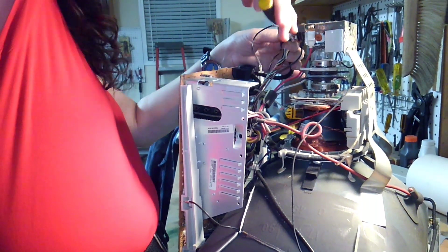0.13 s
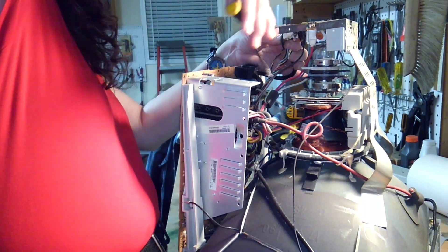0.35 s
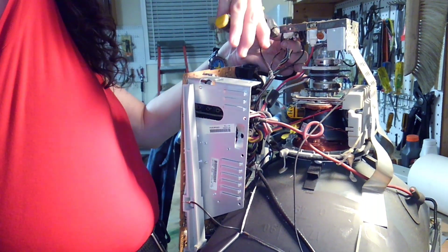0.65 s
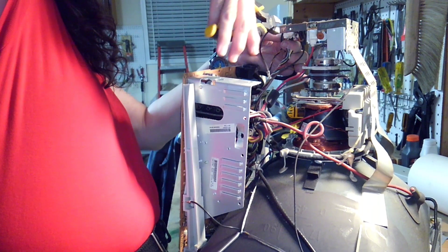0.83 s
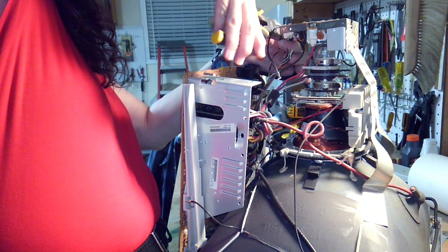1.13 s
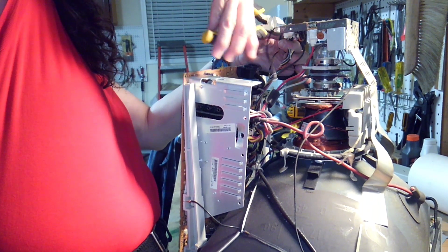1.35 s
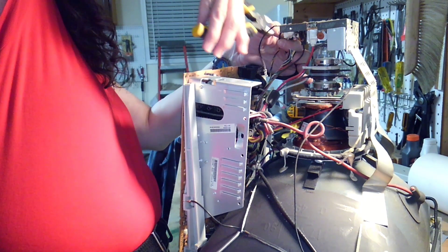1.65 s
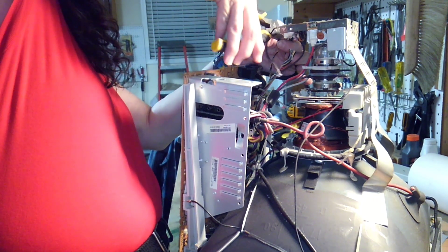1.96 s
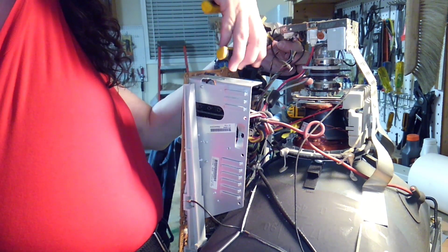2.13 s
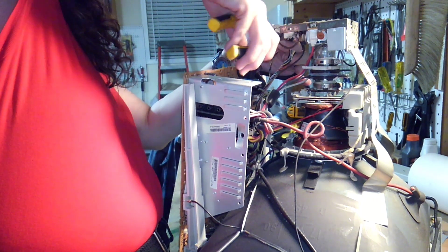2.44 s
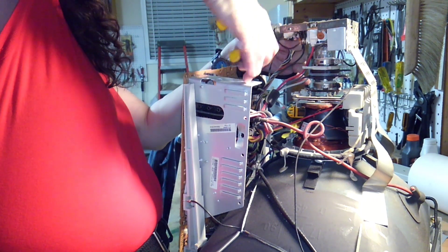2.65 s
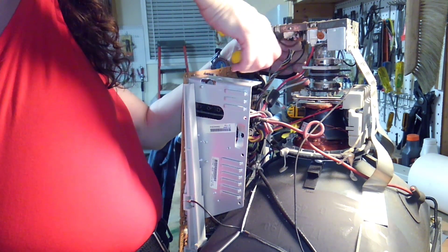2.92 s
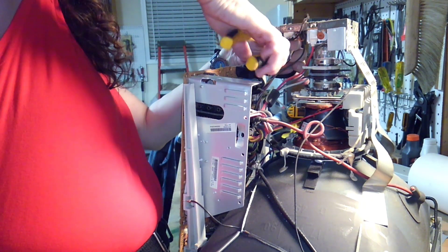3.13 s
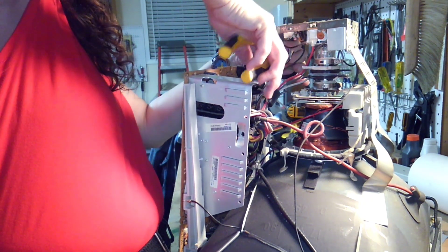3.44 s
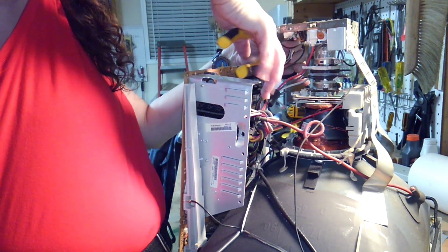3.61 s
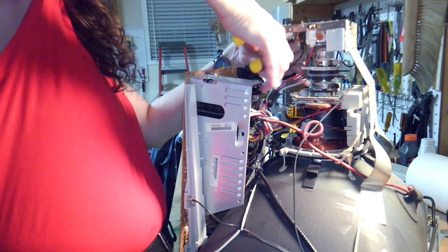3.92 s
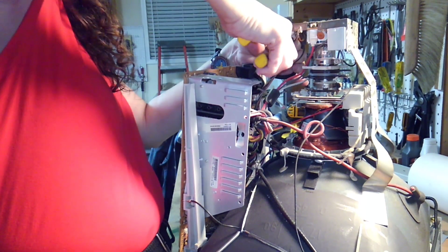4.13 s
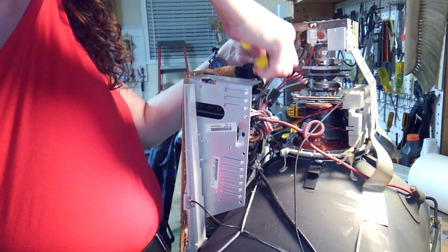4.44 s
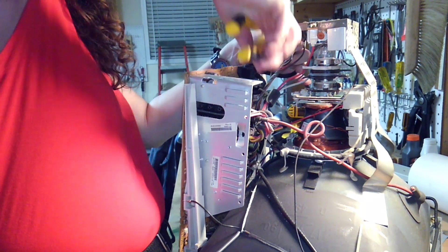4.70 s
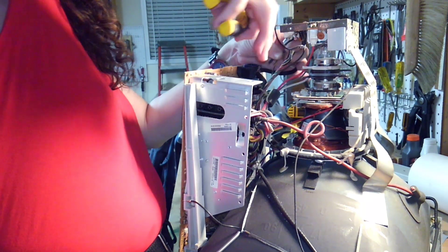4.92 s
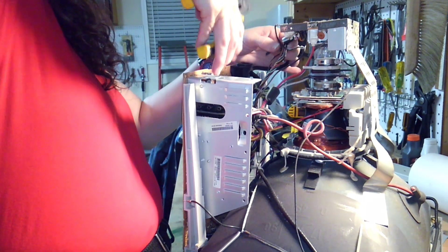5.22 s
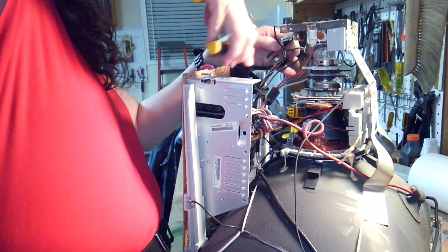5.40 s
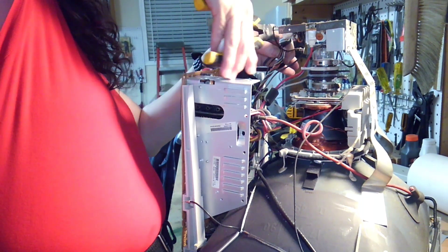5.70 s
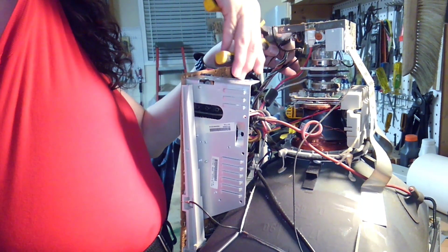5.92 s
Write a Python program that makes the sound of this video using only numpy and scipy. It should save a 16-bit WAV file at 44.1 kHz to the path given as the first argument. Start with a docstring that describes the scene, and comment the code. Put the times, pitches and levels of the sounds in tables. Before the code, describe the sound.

Wire cutters tick lightly, snap hard twice, scrape dragged wires and thump the bench softly in a hard-walled workshop with quiet background noise.

```python
"""Wire cutting inside an opened monitor

Hand cutters snip wire inside an opened monitor on a workshop bench, an arm's length from a small camera.
Each contact is a spray of tiny cracks lasting milliseconds, shaped by the broad resonances of the case.
Dull knocks, a faint ping and dragged wires join in; firm contacts thump the bench in two low modes.
A hard-walled room answers with a bright tail, over microphone hiss and a low building rumble."""
import sys
import numpy as np
from scipy import signal
from scipy.fft import rfft, irfft, next_fast_len
from scipy.io import wavfile

SR = 44100
rng = np.random.default_rng(int(sys.argv[2]) if len(sys.argv) > 2 else 0)


def transcribe(u):
    """Save the signal u as a 16-bit wav file named by the first command-line argument.

    u: samples, shape (n,) or (channels, n), limited to [-1, 1]; the rate is SR.
    q: integer samples, one column per channel.
    """
    v = np.clip(np.atleast_2d(u).T, -1, 1)
    q = np.round(v * 32767).astype(np.int16)
    wavfile.write(sys.argv[1], SR, q)


def makeup_ratio(level_db):
    """Linear amplitude ratio for a level in decibels (20 dB per factor of ten)."""
    decades = np.asarray(level_db, float) / 20
    return 10 ** decades


N = 267246  # length in samples
TIME = np.arange(N) / SR  # seconds

# Contacts of jaws and wire ends. Each row: start in seconds, peak of the direct sound in dB,
# crack centre in Hz, lower ring in dB relative to the crack, length of the spray in ms.
CONTACTS = [(0.034, -42, 5900, 3, 26), (0.0593, -29, 6500, -2.5, 18), (0.335, -37, 6100, -6, 14),
            (0.3995, -28, 6500, -14, 13), (0.401, -28.5, 4200, -6, 13), (0.881, -41.5, 4960, -2, 6),
            (0.9267, -22, 4110, -5, 7.5), (0.93, -32.5, 6400, -17, 7.4), (1.527, -44, 5990, -10, 6.3),
            (1.5385, -12.5, 5630, -2, 16), (1.544, -8.5, 6540, -12.5, 7.8), (1.5512, -16.5, 3700, -9, 3.7),
            (1.982, -46, 5700, 1, 7), (2.6163, -37, 6500, -9, 4.6), (2.64, -28.5, 5830, -14, 10.6),
            (2.698, -41, 6000, -16, 11), (2.705, -44, 8800, -20, 28), (2.719, -37, 6800, -14, 11),
            (2.737, -36, 6600, -13, 7.9), (3.173, -37.5, 6070, -5, 14), (3.682, -41.5, 6130, -1, 15),
            (3.770, -34, 6300, -14, 10), (3.786, -42, 6050, -1, 6), (3.815, -37, 7200, -12, 6.7),
            (3.93, -52, 6000, -13, 11), (4.327, -4, 5180, -8, 2.8), (4.332, -9, 6000, -22, 6.2),
            (4.3717, -15, 5200, -17, 6), (4.3986, -9, 5660, -4, 7), (4.4039, -10, 6400, -13, 5),
            (4.410, -23, 6130, -15, 4.2), (4.463, -25, 5770, -2, 5.6), (5.367, -45, 5700, -4, 18),
            (5.691, -46.5, 5500, -22, 17), (5.73, -52, 5500, -18, 12), (5.819, -44.5, 6200, -14, 9.8),
            (5.896, -35, 6700, -8.5, 12), (5.998, -28.5, 6200, -5, 15), (6.005, -30.5, 6200, -6, 19)]
# Dull knocks on the plastic case. Each row: start in seconds, peak of the direct sound in dB,
# centre in Hz, length of the spray in ms.
CASE_KNOCKS = [(0.926, -39.5, 710, 15), (0.926, -37, 1370, 17), (1.54, -41.5, 840, 17),
               (2.642, -36.5, 700, 10), (2.699, -42.5, 434, 27), (2.711, -42, 1250, 33),
               (3.175, -41, 1900, 12), (3.684, -45.5, 1910, 10), (3.77, -45.5, 780, 20),
               (3.787, -40, 2130, 13), (3.81, -43, 900, 22), (4.325, -33, 350, 10), (4.327, -19, 1840, 5.4),
               (4.397, -34, 520, 41), (4.405, -33, 1010, 63), (4.441, -39, 220, 23), (4.46, -50, 635, 6.5),
               (4.537, -31.5, 1470, 13), (4.56, -36.5, 497, 14), (5.101, -37.5, 423, 6.3),
               (5.928, -47, 600, 16), (6.002, -42, 2720, 12), (6.01, -45, 205, 8.9)]
# Cut wire ends that ping. Each row: start in seconds, tone in Hz, starting level in dB, t60 in seconds.
WIRE_PINGS = [(0.93, 1675, -46, 0.25)]
# Broad resonances of case and microphone. Each row: centre in Hz, half-width in octaves, weight in dB.
CASE_RESONANCES = [(1770, 0.11, -4.5), (2646, 0.41, -7), (3190, 0.3, -8), (3700, 0.096, -1.5),
                   (4200, 0.18, -3), (5075, 0.14, -2), (5700, 0.055, 1.5), (6140, 0.049, -2.5),
                   (6700, 0.086, -1.5), (7380, 0.13, -3), (8790, 0.1, -6.5), (10170, 0.24, -0.5),
                   (12900, 0.15, -2.5)]
# Wires dragged over the case. Each row: loudest moment in seconds, level of the main shade in dB,
# build-up in dB per second, dying away in dB per second.
WIRE_DRAGS = [(0.399, -46.5, 110, 500), (2.7, -47, 1500, 232), (3.773, -48, 258, 500),
              (3.85, -63, 300, 200), (4.337, -37, 4000, 600), (4.406, -26.5, 168, 138)]
# Pushes that reach the bench top. Each row: start in seconds, level of the lower mode in dB,
# upper mode in dB relative to the lower.
BENCH_PUSHES = [(0.032, -41.5, -7), (0.101, -42, -4), (0.408, -47, -11), (1.59, -59.5, 20),
                (2.647, -47.5, 9.5), (2.711, -41.5, -12), (2.767, -46, 3), (3.268, -42.5, -2.5),
                (3.786, -58, 9), (4.355, -35, 2), (4.385, -46.5, 11), (4.432, -40.5, 13.5),
                (4.453, -32.5, 5), (4.6, -39.5, 1.5), (6.005, -36.5, -3)]
# The two lowest bench modes. Each row: frequency in Hz, t60 in seconds.
BENCH_MODES = [(66, 0.47), (122, 0.255)]
# Reverberation time of the room. Each row: frequency in Hz, t60 in seconds.
REVERBERATION = [(150, 0.99), (700, 0.96), (2000, 0.73), (3700, 0.83), (4700, 0.76), (6200, 0.71),
                 (8000, 0.6), (11000, 0.47), (15000, 0.21)]
# Spectral shape of the microphone hiss. Each row: frequency in Hz, relative level in dB.
HISS_SHAPE = [(120, -55), (200, -18), (219, -9.5), (289, -4), (353, -5), (473, -7), (635, -8), (735, -9),
              (1560, -13.5), (7270, -21), (16000, -20.5)]
# Spectral shape of the building rumble. Each row: frequency in Hz, relative level in dB.
RUMBLE_SHAPE = [(12, -63), (20, -35), (27, -59), (30, -24), (40, -5), (59, 0.5), (97, -3.5), (188, -8.5),
                (223, -12.5), (250, -16), (320, -35), (550, -120)]

CRACK_HZ = np.geomspace(200, 20000, 240)  # frequencies at which a crack spectrum is drawn


def clicks():
    """Impact excitation: every contact is a short burst filtered by the resonances it wakes.
    Row one is the direct sound; row two is what the walls receive, one blow a contact."""
    out = np.zeros((2, N))
    for start, peak_db, centre_hz, lower_db, ms in CONTACTS:
        # a broad contact that wakes the lower ring has more top edge, and so has a harder one
        top_db = -6 + 0.61 * lower_db + 0.35 * peak_db
        snap = colour(burst(ms), crack(centre_hz, lower_db, top_db))
        add(out, start, peak(snap, peak_db))
    return out


def crack(centre_hz, lower_db, top_db):
    """Source-filter principle: where a contact lands decides which case resonances it wakes.
    Returns (Hz, dB) points."""
    case = sum(makeup_ratio(2 * db) * hump(CRACK_HZ, hz, octaves) for hz, octaves, db in CASE_RESONANCES)
    lower = hump(CRACK_HZ, 3770, 0.98)
    top = hump(CRACK_HZ, 9100, 1.0)
    # the struck part rings loudest at its own pitch, by a narrow hump weighted 4 dB
    spot = hump(CRACK_HZ, centre_hz, 0.29) + makeup_ratio(2 * 4) * hump(CRACK_HZ, centre_hz, 0.045)
    reach = spot + makeup_ratio(2 * lower_db) * lower + makeup_ratio(2 * top_db) * top
    return np.transpose([CRACK_HZ, 10 * np.log10(case * reach + 1e-7)])


def hump(hz, centre_hz, octaves):
    """A broad resonance is a bell of power on a log-frequency axis, down to 1/e at the half-width."""
    return np.exp(-(np.log2(hz / centre_hz) / octaves) ** 2)


def burst(ms):
    """Fracture noise: a sharp first crack, then a spray of smaller ones that thins out.
    Row two holds the spray's energy as one blow."""
    t = np.arange(4096) / SR
    spray = grains(len(t), scatter_db=1.5) * np.exp(-(t * 1000 / ms) ** 1.2)
    spray[0] = 2.32 * np.abs(spray).max()
    blow = np.sqrt(np.sum(spray ** 2)) * (t == 0)
    return np.array([spray, blow])


def grains(count, scatter_db):
    """Superposed micro-cracks: dense noise whose grain size is uneven but bounded."""
    size = np.minimum(rng.exponential(size=count), 6)
    return rng.standard_normal(count) * makeup_ratio(scatter_db * size)


def knocks():
    """Band-limited impact: a dull knock on plastic is a burst kept to about an octave.
    Rows as in clicks()."""
    out = np.zeros((2, N))
    for start, peak_db, centre_hz, ms in CASE_KNOCKS:
        knock = band(burst(ms), centre_hz / 1.65, centre_hz * 1.42)
        add(out, start, peak(knock, peak_db))
    return out


def pings():
    """Free vibration: a cut wire end rings as one exponentially damped sine."""
    out = np.zeros(N)
    t = np.arange(SR // 2) / SR
    for start, hz, level_db, t60 in WIRE_PINGS:
        add(out, start, makeup_ratio(level_db) * np.sin(2 * np.pi * hz * t) * 1000 ** (-t / t60))
    return out


def shade(centre_hz, lower_db, top_db):
    """Filtered noise: endless grains, coloured as one kind of contact and scaled to rms 1."""
    return unit(colour(grains(N, scatter_db=3.6), crack(centre_hz, lower_db, top_db)))


def drags():
    """Friction noise: loose wire ends chatter over the case, rising and dying away linearly in dB."""
    longest_s, low_db, top_db = 0.07, -5, -9  # longest build-up; low and top shades relative to the main
    effort = np.zeros(N)
    for loudest, level_db, rise, fall in WIRE_DRAGS:
        slope = np.where(TIME < loudest, rise, fall)
        swell = makeup_ratio(level_db - slope * abs(TIME - loudest))
        effort += swell * (TIME > loudest - longest_s)
    main, low, top = shade(6040, -34, -32), shade(2270, -7.0, -37), shade(7800, -48, -12)
    return effort * (main + makeup_ratio(low_db) * low + makeup_ratio(top_db) * top)


def rustle():
    """Modulated noise: a faint rustle comes and goes all the time, its level in dB wandering at random."""
    flicker = unit(band(rng.standard_normal(N), 0.58, 35))
    return makeup_ratio(-69 + 3.5 * flicker) * shade(6500, -47, -39)


def bench():
    """Modal synthesis: soft pushes ring the two lowest modes of the bench as damped sines."""
    out = np.zeros(N)
    t = np.arange(SR // 2) / SR
    onset = np.sin(np.pi / 2 * np.minimum(t / 0.0054, 1)) ** 2  # a push takes 5.4 ms to arrive
    low, high = (np.sin(2 * np.pi * hz * t) * 1000 ** (-t / t60) for hz, t60 in BENCH_MODES)
    for start, level_db, upper_db in BENCH_PUSHES:
        add(out, start, makeup_ratio(level_db) * (low + makeup_ratio(upper_db) * high) * onset)
    return out


def room(x):
    """Statistical reverberation: dense reflections, each third of an octave dying at its own rate."""
    level_db, gap_s = -7.5, 0.0015  # energy of the tail; silence before it
    t = np.arange(SR) / SR
    hz, t60 = np.transpose(REVERBERATION)
    tail = np.zeros(SR)
    for centre in 100 * 2 ** np.arange(0, 7.5, 1 / 3):
        decay_s = np.interp(np.log(centre), np.log(hz), t60)
        reflections = band(rng.standard_normal(SR), centre / 1.122, centre * 1.122)
        tail += reflections * np.exp(-np.log(1000) * t / decay_s)
    tail *= np.clip(t / gap_s - 1, 0, 1)  # fades in over one more gap
    tail /= np.sqrt(np.sum(tail ** 2))
    return makeup_ratio(level_db) * signal.fftconvolve(x, tail)[:N]


def hiss():
    """Stationary noise: the microphone hisses smoothly with a fixed spectrum."""
    return makeup_ratio(-54.5) * unit(colour(rng.standard_normal(N), HISS_SHAPE))


def rumble():
    """Slowly modulated low noise: the building rumbles and swells a little."""
    swell = unit(band(rng.standard_normal(N), 0.087, 2.7))
    return makeup_ratio(-54 + 0.77 * swell) * unit(colour(rng.standard_normal(N), RUMBLE_SHAPE))


def colour(x, points):
    """Minimum-phase filtering: (Hz, dB) points shape the spectrum causally, with phase from the cepstrum."""
    size = next_fast_len(x.shape[-1] + 1024) // 2 * 2
    hz, db = np.transpose(points)
    log_hz = np.log(np.arange(size // 2 + 1) * SR / size + 1)
    gain = makeup_ratio(np.interp(log_hz, np.log(hz), db))
    cepstrum = irfft(np.log(gain), size)
    # fold the negative-time half onto the positive one
    cepstrum[1:size // 2] *= 2
    cepstrum[size // 2 + 1:] = 0
    response = np.exp(rfft(cepstrum))
    return irfft(rfft(x, size) * response, size)[..., :x.shape[-1]]


def band(x, lo_hz, hi_hz):
    """Causal band-pass filtering with a maximally flat passband."""
    sos = signal.butter(2, [lo_hz, hi_hz], "bandpass", fs=SR, output="sos")
    return signal.sosfilt(sos, x)


def unit(x):
    """Power normalisation: scale to rms 1."""
    return x / np.sqrt(np.mean(x ** 2))


def peak(x, db):
    """Peak normalisation: scale all rows so that the first one peaks at this level."""
    return x * makeup_ratio(db) / np.abs(x[0]).max()


def add(track, start, x):
    """Linear superposition: mix a short sound in at a time in seconds."""
    i = int(start * SR)
    track[..., i:i + x.shape[-1]] += x[..., :N - i]


def scene():
    """Superposition: impacts and friction excite the room; bench and background lie under them."""
    near, blows = clicks() + knocks()
    friction = drags() + rustle()
    direct = near + pings() + friction
    mix = direct + room(blows + friction) + bench() + hiss() + rumble()
    return mix[None]


def band_limit(x):
    """A steep low-pass at the top of the band."""
    return signal.sosfilt(signal.butter(12, 16640, fs=SR, output="sos"), x)


def record(dry):
    """Band limiting: the microphone drops the deepest bass; a steep filter at 15.9 kHz bounds the band."""
    bass_cut = signal.butter(2, 40, "highpass", fs=SR, output="sos")
    top_cut = signal.ellip(10, 0.2, 80, 15900, fs=SR, output="sos")  # 0.2 dB ripple, 80 dB rejection
    finished = signal.sosfilt(top_cut, signal.sosfilt(bass_cut, dry))
    return band_limit(finished)


dry = scene()
out = record(dry)
transcribe(out)
```